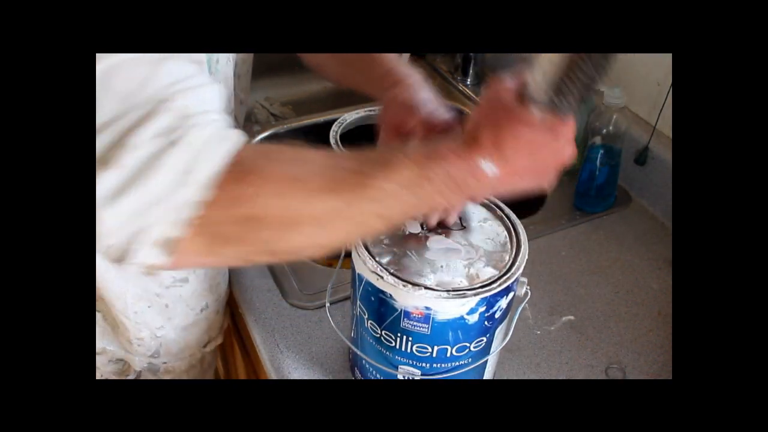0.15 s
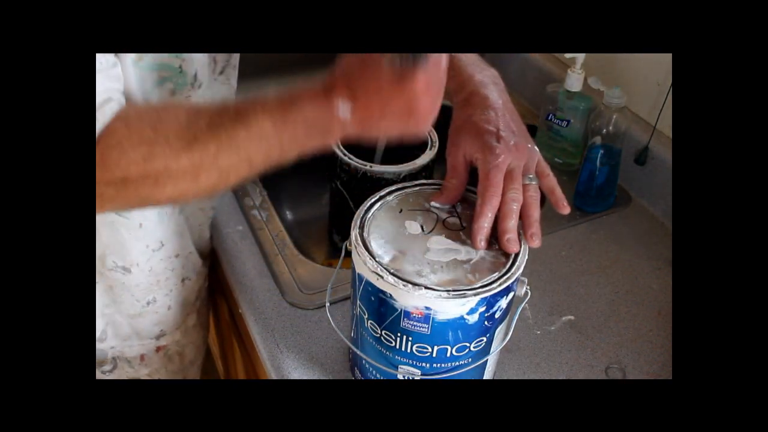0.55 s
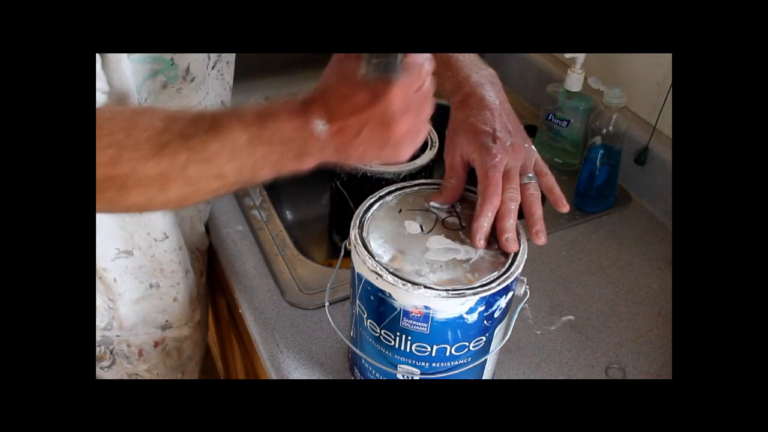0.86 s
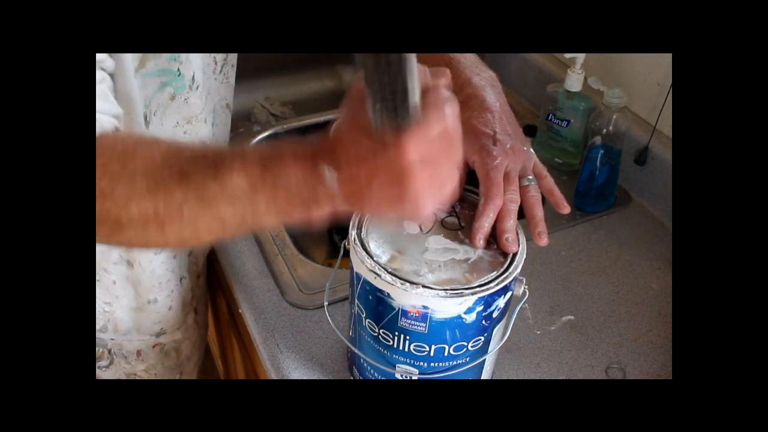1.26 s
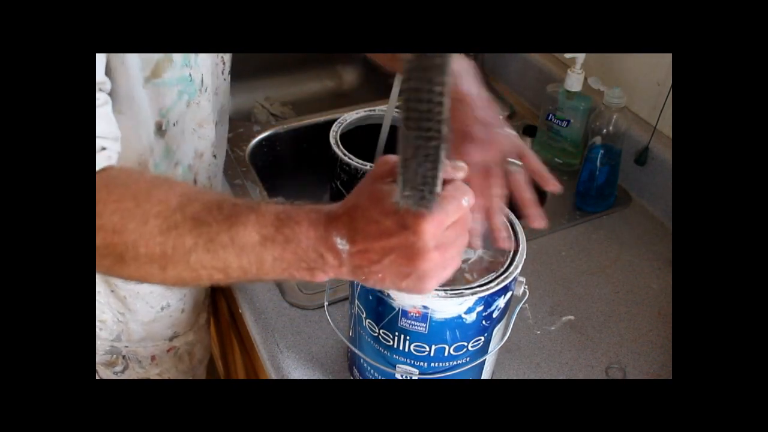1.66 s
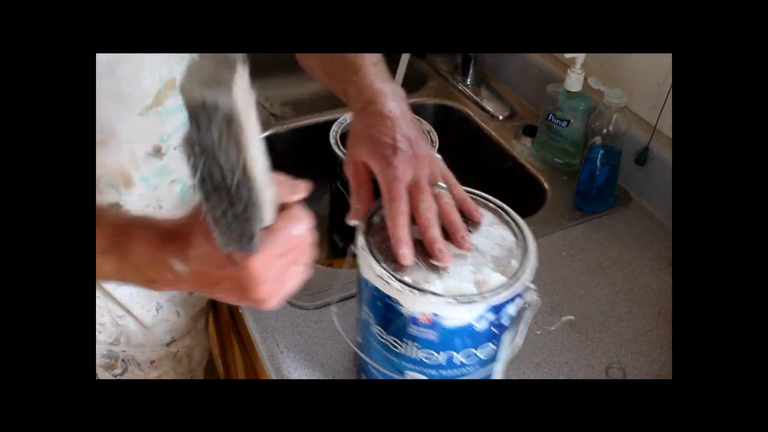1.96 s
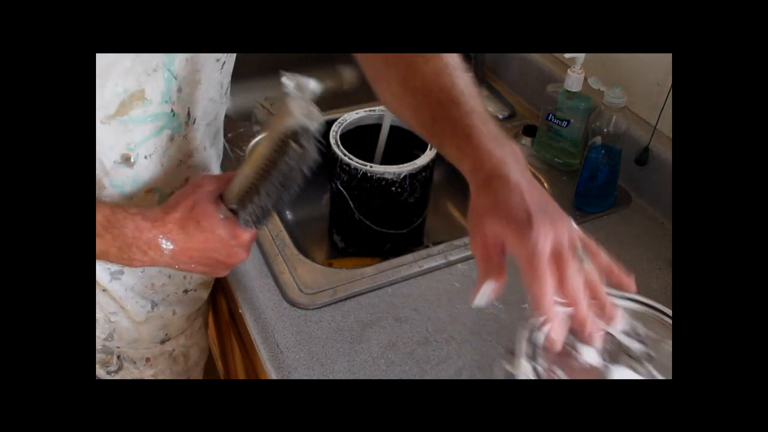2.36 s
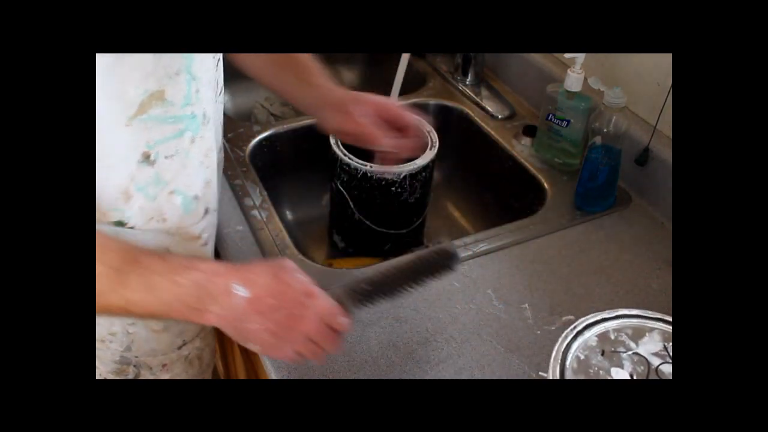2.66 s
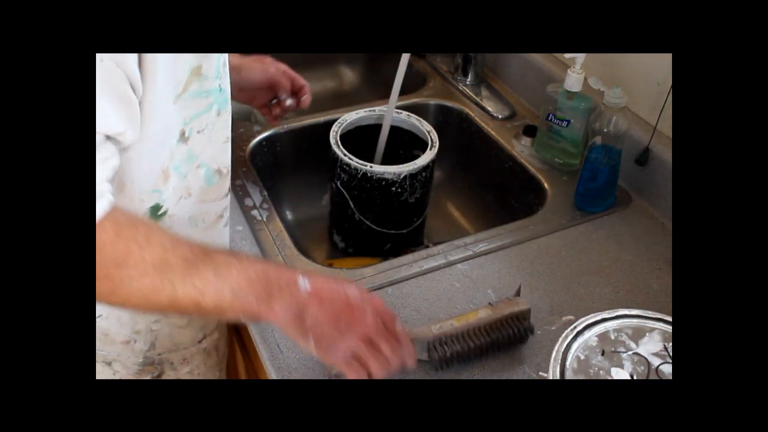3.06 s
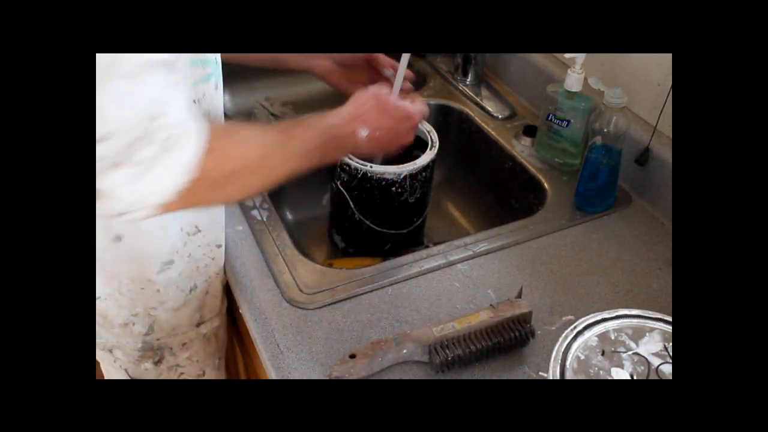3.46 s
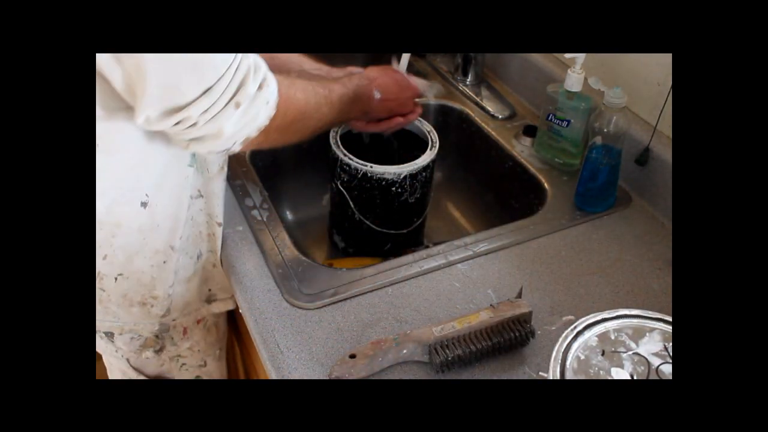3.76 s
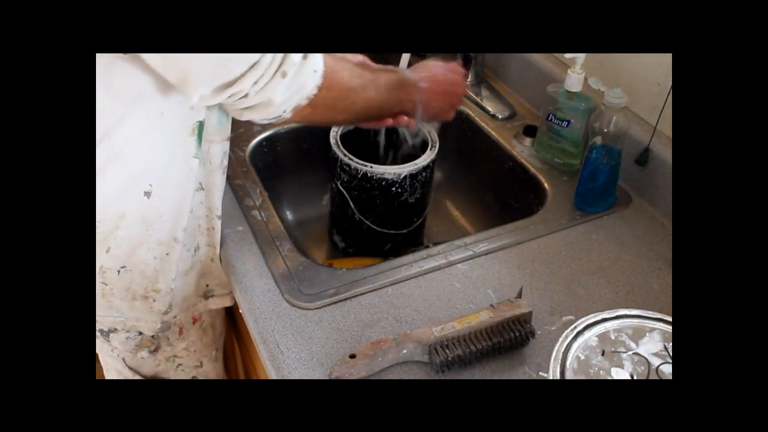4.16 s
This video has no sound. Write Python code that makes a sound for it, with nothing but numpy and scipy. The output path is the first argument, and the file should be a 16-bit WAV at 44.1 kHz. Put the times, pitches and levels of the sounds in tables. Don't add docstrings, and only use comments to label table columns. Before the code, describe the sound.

Close, overloaded metallic knocks on a paint can lid over hissing tap water, followed by a short gritty drag and a wooden clatter.

```python
import sys
import numpy as np
from scipy import signal
from scipy.io import wavfile
from scipy.ndimage import uniform_filter1d

SR = 44100
rng = np.random.default_rng(int(sys.argv[2]) if len(sys.argv) > 2 else 0)


def volts(x):
    e = np.asarray(x, float) / 20
    return 10 ** e


def log_audio(samples):
    frames = np.atleast_2d(samples).T
    limited = np.clip(frames, -1, 1)
    pcm = np.round(limited * 32767).astype(np.int16)
    wavfile.write(sys.argv[1], SR, pcm)


N = 189652
LEAD = 8820

# frequency in Hz, T60 in seconds.
ROOM_T60 = [(60, 0.79), (250, 0.35), (700, 0.32), (1500, 0.25), (3000, 0.28), (8000, 0.54)]
# frequency in Hz, density in dB per Hz.
SPRAY = [(1470, -22), (2500, -15.5), (2720, 6), (2850, -3), (3280, -3), (4210, -1), (4440, 3), (4840, 3),
         (5190, -2), (5610, 1.5), (7420, 1.5), (8080, 1.5), (11100, -6.5), (14600, 4.5), (16000, -80.5)]
# frequency in Hz, density in dB per Hz.
GURGLE = [(35, -59), (60, -22), (91, -31), (113, -23.5), (216, -5.5), (359, -5.5), (446, -7), (726, -5),
          (885, -16), (935, -12), (1820, -4.5), (2520, -10.5), (4500, -12), (5850, 8), (9900, -120)]
# start in seconds, level in dB, pitch in Hz, T60 in seconds.
PLOPS = [
    (3.72, -28, 2120, 0.033),
    (4.089, -42, 204, 0.16),
    (4.172, -28, 720, 0.026),
    (4.182, -44, 230, 0.19),
    (4.225, -38.5, 620, 0.18),
]
# resonance in Hz, width in Hz, level in dB.
SCRAPE = [(230, 8.2, -13.5), (470, 58, -8.5), (654, 57, 1.5), (788, 60, -0.5), (1030, 78, -0.5),
          (1270, 350, -1), (1980, 1040, -2.5)]
# frequency in Hz, level in dB, T60 in seconds.
HANDLE = [(212, -0.5, 0.073), (272.3, 10, 0.027), (307.6, -0.5, 0.017), (393, 4, 0.035), (477, 2, 0.079),
          (563, -5, 0.028), (680, -1, 0.038), (980, -5, 0.012), (1020, -9, 0.012), (1630, -15.5, 0.012),
          (2470, -14.5, 0.0029), (3760, -17, 0.015)]
# start in seconds, then crack, boom, low handle and high handle in dB.
LAID_DOWN = [
    (3.022, -10.5, -15, -21, -16.5),
    (3.067, -6, -42, -27, -27),
    (3.0698, -14, -48, -28.5, -9),
]
# frequency in Hz, level in dB, T60 in seconds.
CAN = [(161, -49, 0.022), (213.3, -0.5, 0.11), (269, 5, 0.048), (315, 6, 0.04), (344.5, 2, 0.16),
       (381.7, 3, 0.071), (439.6, -0.5, 0.054), (477, -1, 0.025), (632, -1, 0.046), (713, -8.5, 0.072),
       (762, 4, 0.014), (890, 4.5, 0.0053)]
# frequency in Hz, level in dB, T60 in seconds.
RIM = [(1044, -11, 0.054), (1275, -5.5, 0.011), (1444, -5.5, 0.0087), (1806, -6.5, 0.0076),
       (2314, -20, 0.024), (2690, -18, 0.015), (3680, -5.5, 0.0022), (4050, -7, 0.0022),
       (5050, -14, 0.0024), (7260, -27, 0.0027)]
FAMILY_EDGES_HZ = [270, 365, 550, 1000]
# start in seconds, then rim crack, counter boom, can wall and lid in dB.
BLOWS = [
    (0.104, -15, -15.5, -25, -17.5),
    (0.589, -28.5, -30.5, -25.5, -27),
    (0.865, -7.5, -22.5, -33, -14),
    (1.058, -9, -22, -21.5, -12),
    (1.217, -10, -49, -19, -15.5),
    (1.455, -3.5, -18, -14, -20.5),
    (1.671, -8.5, -13, -18, -12.5),
]
EARLIER_BLOW = (0, 10, -10, -12.5, -4.5)
# start in seconds, lid in dB, rim crack in dB.
REBOUNDS = [
    (0.879, -7, 0),
    (1.072, -16.5, -6.5),
    (1.23, -12.5, -12),
    (1.47, -16, -10),
]
# Boom, wall and bottom in a rebound, in dB relative to the lid.
REBOUND_SHARES_DB = (-10, -12, -15.5)

RUMBLE_DB, SHUDDER_DB = -98, -43
WALL_CUT_HZ = 3700
ECHO_DB, FIRST_ECHO_S = -34, 0.001
FAR_WALL_S, FAR_WALL_DB_PER_S = 0.3, 120
SPRAY_DB, GURGLE_DB = -29, -37
SCREEN_DB, CLEARED_S, CLEARING_S = -2, 2.63, 0.26
HANDS_IN_S, HANDS_SHARE, HANDS_HZ = 3.36, 0.26, 970
SLIDE_START_S, SLIDE_S, SLIDE_DB = 1.925, 0.98, -37
SPEED_POWER, SPEED_BRIGHTENS = 2.6, 0.6
DULLING_DB = -10
HANDLE_MIDDLE_DB = -11.5
BOTTOM_DB = -5.5
RATTLE_DB, RATTLE_PER_S, RATTLE_T60_S, RATTLE_RISE_S = -22, 900, 0.55, 0.025
RATTLE_LOW_HZ, RATTLE_HIGH_HZ = 450, 2300
EARLIER_BY = 4400
SQUARE_LAW = 0.04


def rms_one(x):
    return x / np.sqrt(np.mean(x ** 2) + 1e-20)


def butter(x, order, hz, kind="low"):
    return signal.sosfilt(signal.butter(order, hz, kind, fs=SR, output="sos"), x)


def ramp(start_s, length_s):
    return np.clip((np.arange(N) / SR - start_s) / length_s, 0, 1)


def at_hz(points, hz):
    points = np.array(points)
    return np.interp(np.log(hz), np.log(points[:, 0]), points[:, 1])


def drift(rate):
    r = np.exp(-80 * np.pi * rate / SR)
    slow = signal.lfilter([1], [1, -2 * r, r * r], rng.standard_normal(N // 40 + 2002))[2000:]
    return np.interp(np.arange(N) / 40, np.arange(len(slow)), rms_one(slow))


def ring(force, hz, t60):
    r, w = volts(-60 / (t60 * SR)), 2 * np.pi * hz / SR
    return signal.lfilter([0, np.sin(w)], [1, -2 * r * np.cos(w), r * r], force + 1e-18)


def grains(per_s, spread_db):
    sizes = volts(spread_db * np.minimum(rng.exponential(1, N), 5)) * rng.choice([-1, 1], N)
    return sizes * (rng.random(N) < per_s / SR)


def coloured(sources, spectrum, patchy_db):
    lowest, highest = spectrum[0][0], spectrum[-1][0]
    edges = lowest * 2 ** np.arange(0, np.log2(highest / lowest) + 0.3, 1 / 3)
    out, together = 0, drift(0.98)
    for k, (low, high) in enumerate(zip(edges, np.minimum(edges[1:], 19000))):
        band = butter(sources[k % 2], 2, [low, high], "band")
        flicker_db = patchy_db * (0.27 * together + drift(6.3))
        out = out + band * volts(at_hz(spectrum, np.sqrt(low * high)) + flicker_db)
    return rms_one(out)


def rumble(shake):
    low = rms_one(butter(rng.standard_normal(N), 2, 50))
    return (volts(RUMBLE_DB) + volts(SHUDDER_DB + 18) * shake) * low


def kitchen(x):
    age = np.arange(SR // 2) / SR
    edges, echoes = 60 * 2 ** np.arange(0, 7.6, 0.25), 0
    for low, high in zip(edges, edges[1:]):
        band = butter(rng.standard_normal(len(age) + SR), 2, [low, high], "band")[SR:]
        power = uniform_filter1d(band ** 2, round(2.5 * SR / (high - low)))
        band /= np.sqrt(power * SR / 2 / (high - low))
        echoes = echoes + band * volts(-60 * age / at_hz(ROOM_T60, np.sqrt(low * high)))
    near_walls = 1 - np.exp(-(age / FIRST_ECHO_S) ** 2)
    far_rooms_db = FAR_WALL_DB_PER_S * np.maximum(age - FAR_WALL_S, 0)
    echoes = echoes * near_walls * volts(ECHO_DB + far_rooms_db)
    return signal.fftconvolve(butter(x, 1, WALL_CUT_HZ), echoes)[:len(x)]


def bubbles(spectrum, low_hz, high_hz, per_s, cycles):
    born = grains(per_s, 2.5)
    pitches = np.geomspace(low_hz, high_hz, 40) * rng.uniform(0.98, 1.02, 40)
    dealt, out = rng.integers(0, 40, N), 0
    for k, hz in enumerate(pitches):
        rings = rms_one(ring(born * (dealt == k), hz, cycles / hz))
        out = out + volts(at_hz(spectrum, hz)) * hz ** 0.5 * rings
    return rms_one(out)


def tap():
    screened = np.clip(0.5 - (np.arange(N) / SR - CLEARED_S) / CLEARING_S, 0, 1)
    spray = coloured([grains(14000, 0.88), grains(14000, 0.6)], SPRAY, patchy_db=-0.4)
    spray += volts(-2.5) * bubbles(SPRAY, 2800, 10500, per_s=4000, cycles=330)
    gurgle = coloured([grains(2500, 0.93), grains(2500, 1.19)], GURGLE, patchy_db=-0.68)
    gurgle += volts(-7.5) * bubbles(GURGLE, 1007, 3288, per_s=600, cycles=380)
    low_gurgle = signal.sosfiltfilt(signal.butter(2, HANDS_HZ, fs=SR, output="sos"), gurgle)
    gurgle -= HANDS_SHARE * ramp(HANDS_IN_S, 0.17) * low_gurgle
    return volts(SPRAY_DB - 2.5 + SCREEN_DB * screened) * spray + volts(GURGLE_DB) * gurgle


def plops():
    out = np.zeros(N)
    for s, level_db, hz, t60 in PLOPS:
        out += ring(volts(level_db) * (np.arange(N) == round(s * SR)), hz, t60)
    return out


def slide():
    progress = ramp(SLIDE_START_S, SLIDE_S)
    speed, out = np.abs(np.sin(np.pi * progress)), 0
    for hz, width_hz, peak_db in SCRAPE:
        tilt_db = DULLING_DB * (progress - 0.5) * np.log2(hz / 700)
        brightening = speed ** (SPEED_BRIGHTENS * np.log2(hz / 200))
        slips = rms_one(ring(grains(1500, 2.0), hz, np.log(1000) / np.pi / width_hz))
        out = out + brightening * volts(peak_db + tilt_db + 1.6 * drift(22)) * slips
    return volts(SLIDE_DB) * speed ** SPEED_POWER * rms_one(butter(out, 4, 190, "high"))


def contacts(events, bottom_db, rebounds=()):
    rows = [(s, crack, boom, wall, lid + bottom_db, lid) for s, crack, boom, wall, lid in events]
    return rows + [(s, crack, *(lid + np.array(REBOUND_SHARES_DB)), lid) for s, lid, crack in rebounds]


def struck(events, modes, chatter_s, vary_db, trim_db):
    rows, out = np.array(events)[:, [0, 2, 3, 4, 5, 1]], np.zeros(N + LEAD)
    age = np.arange(900) / SR
    chatter = rng.standard_normal((len(rows), len(age))) * np.exp(-age / chatter_s) * 0.035
    chatter[:, 0] = 1
    chance = rng.standard_normal((len(rows), len(modes)))
    for k, (hz, level_db, t60) in enumerate(modes):
        family = 1 + np.searchsorted(FAMILY_EDGES_HZ, hz)
        force = np.zeros(N + LEAD)
        for row, contact, luck in zip(rows, chatter, chance):
            at = round(row[0] * SR) + LEAD
            force[at:at + len(age)] += contact * volts(row[family] + level_db + trim_db + vary_db * luck[k])
        out += ring(force, hz, t60) * (-1) ** k
    return out


def brush_laid_down():
    landings = contacts(LAID_DOWN, HANDLE_MIDDLE_DB)
    return struck(landings, HANDLE, chatter_s=0.00036, vary_db=3.0, trim_db=3.5)


def shaking():
    age = np.arange(N)[:, None] / SR - [s for s, *_ in BLOWS]
    size = volts([(crack + lid) / 2 for _, crack, *_, lid in BLOWS])
    size = size * volts(-60 * np.maximum(age, 0) / RATTLE_T60_S)
    return np.sum(size * np.clip(age / RATTLE_RISE_S, 0, 1), axis=1)


def rattle(shake):
    pitches = np.geomspace(RATTLE_LOW_HZ, RATTLE_HIGH_HZ, 12)
    born, dealt = grains(RATTLE_PER_S, 3.56), rng.integers(0, 12, N)
    rings = sum(ring(born * (dealt == k), hz, 12.0 / hz) for k, hz in enumerate(pitches))
    return volts(RATTLE_DB + 20) * shake * rms_one(rings)


def lid_blows():
    blows = contacts(BLOWS, BOTTOM_DB, REBOUNDS)
    out = struck(blows, CAN + RIM, chatter_s=0.0037, vary_db=2.75, trim_db=8.0)
    earlier = contacts([EARLIER_BLOW], BOTTOM_DB)
    tail = struck(earlier, CAN + RIM, chatter_s=0.00095, vary_db=7.0, trim_db=6.5)
    out[:-EARLIER_BY] += tail[EARLIER_BY:]
    return out


def scene():
    shake = shaking()
    near = lid_blows() + brush_laid_down()
    near[LEAD:] += slide() + plops() + rattle(shake)
    near = butter(near, 3, 165, "high")
    mono = (near + kitchen(near))[LEAD:] + tap() + rumble(shake)
    return np.stack([mono, mono])


def roll_off(x):
    return signal.sosfilt(signal.butter(12, 16570, fs=SR, output="sos"), x)


def record(dry):
    x = butter(dry, 2, 60, "high")
    over_db = np.clip(20 * np.log10(np.abs(x[0]) + 1e-9) + 7.6, 0, 9.5)
    recovery_db = 160 * np.arange(N) / SR
    duck_db = np.maximum.accumulate(over_db + recovery_db) - recovery_db
    late = round(0.0096 * SR)
    duck_db = np.concatenate([np.zeros(late), duck_db[:-late]])
    x = x * volts(-uniform_filter1d(duck_db, round(0.005 * SR)))
    x = x + SQUARE_LAW * butter(x ** 2, 1, 15, "high")
    x = x / (1 + np.abs(x / 0.52) ** 8) ** (1 / 8)
    return roll_off(x)


dry = scene()
out = record(dry)
log_audio(out)
```